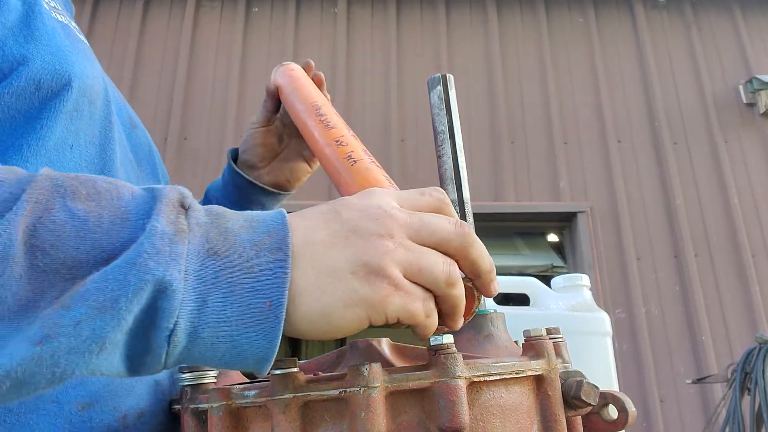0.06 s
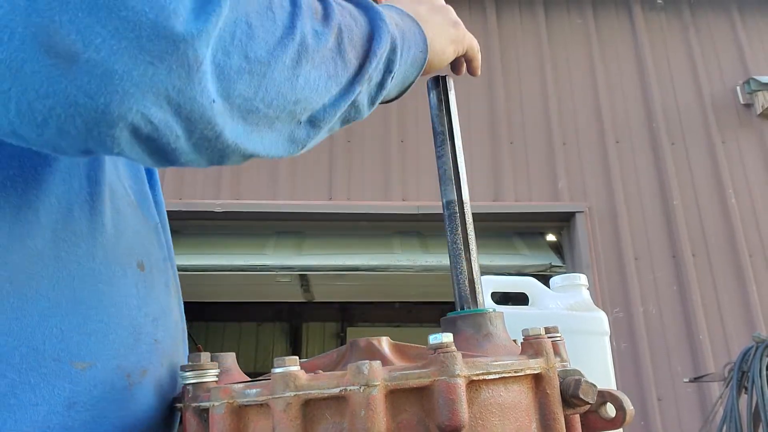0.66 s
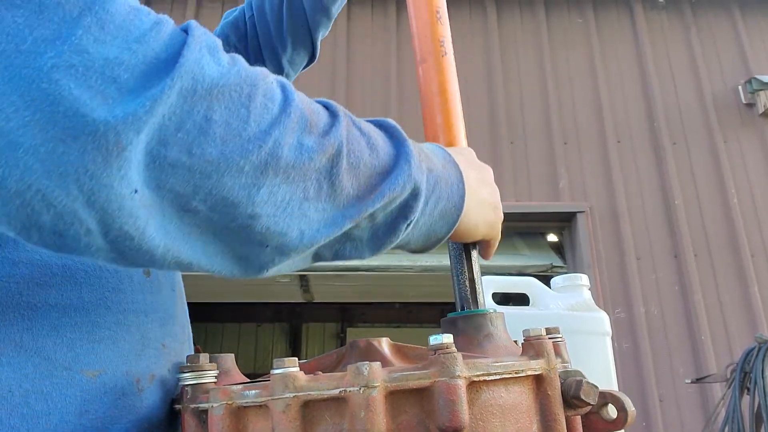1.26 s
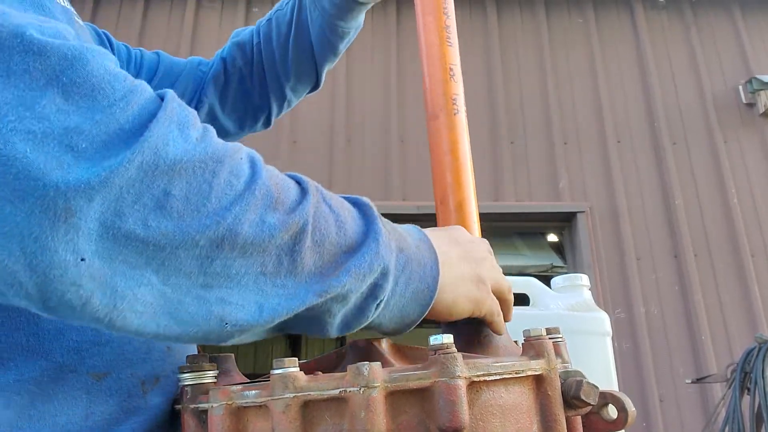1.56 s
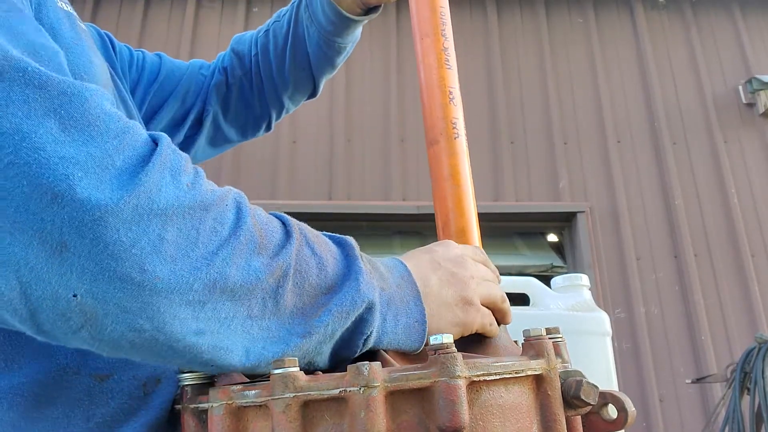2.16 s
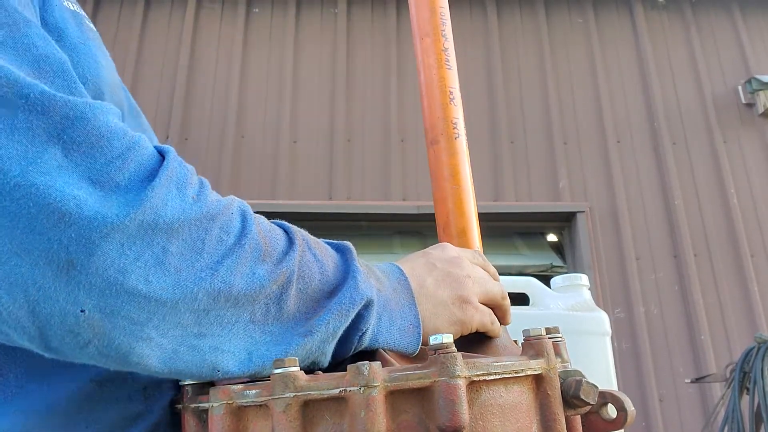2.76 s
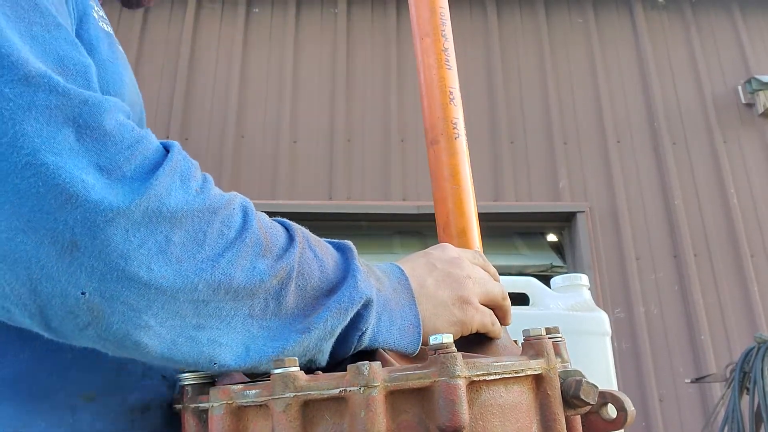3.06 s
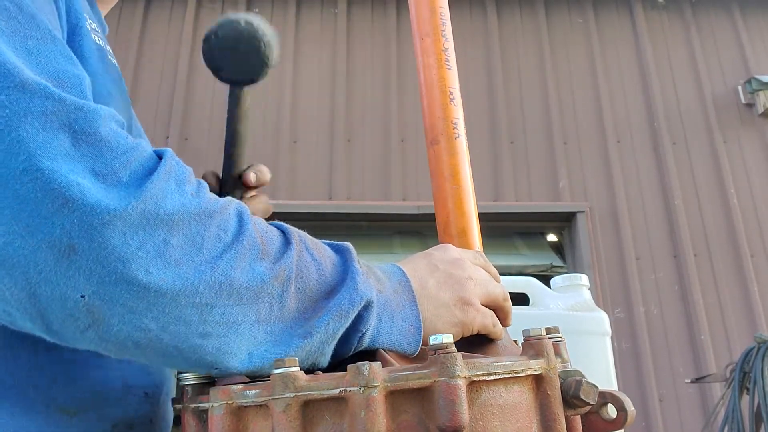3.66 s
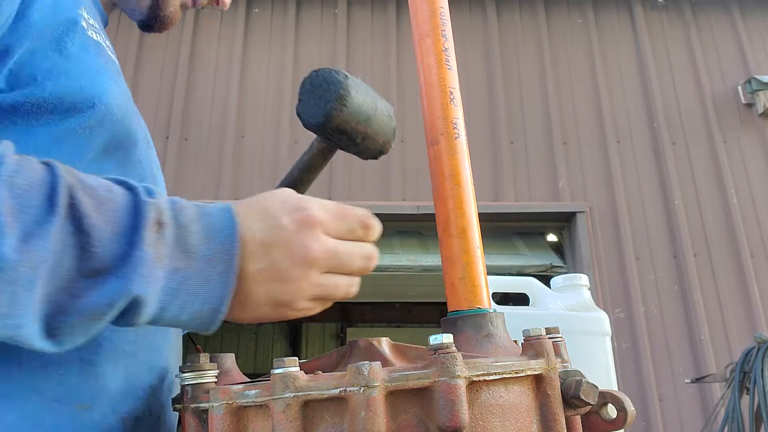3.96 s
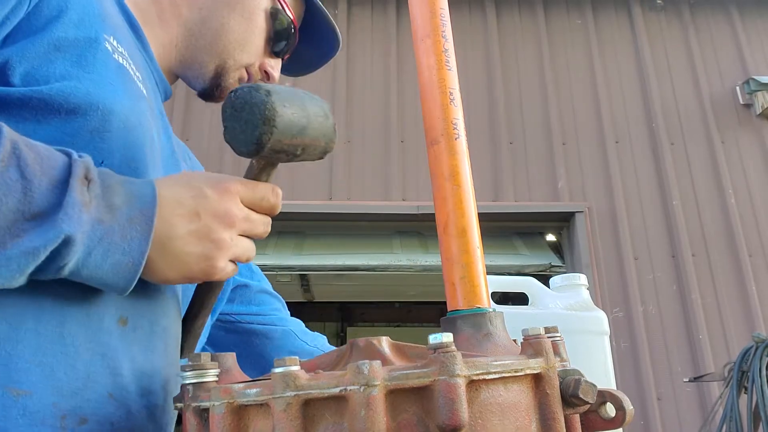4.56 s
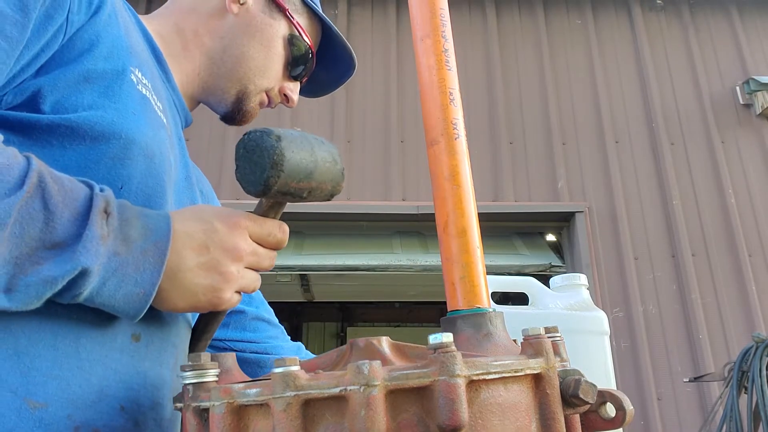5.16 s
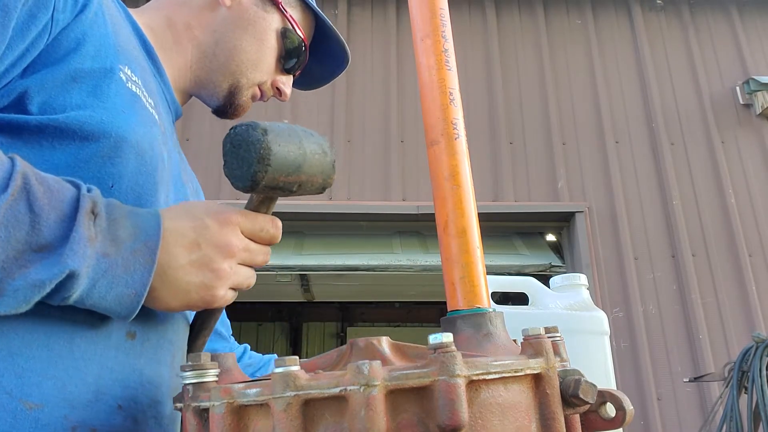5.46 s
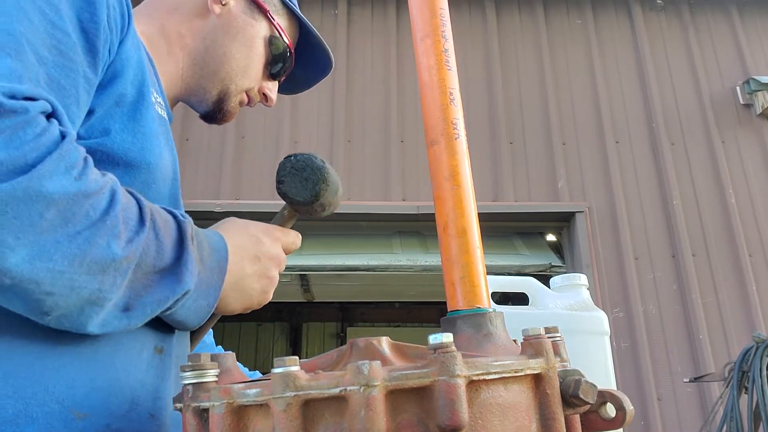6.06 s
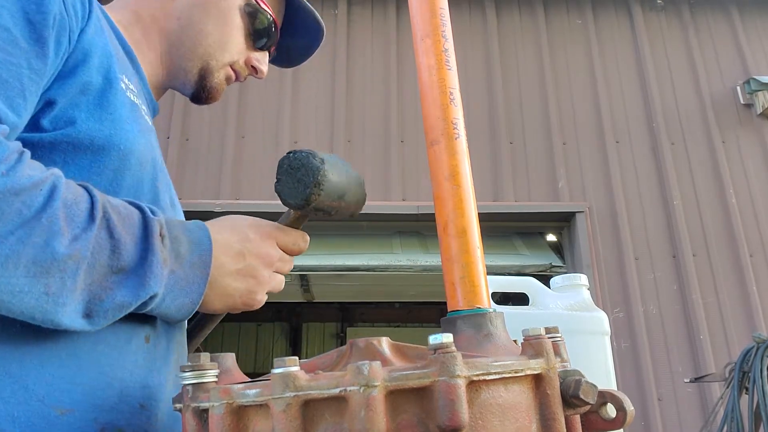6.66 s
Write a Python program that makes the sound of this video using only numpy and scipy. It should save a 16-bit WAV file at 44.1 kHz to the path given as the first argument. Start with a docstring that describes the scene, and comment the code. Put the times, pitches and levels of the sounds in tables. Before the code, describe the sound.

Hollow pipe knocks, rubbing hands and a ringing metal clank outdoors, ending in two loud thuds, with wind on the microphone.

```python
"""Outside a metal workshop a light wind buffets the microphone ports while hands and sleeves rub.
A plastic pipe knocks onto a gearbox shaft (0.8 s), its air column ringing, and slides down by stick-slip
friction; dull knocks, ticks and scrapes follow. A mallet is lifted with a clank of metal modes (3.4 s),
the grip squeaks, and small birds call far away (from 4.3 s). Last come the heaviest knocks
(6.1 and 6.5 s); with the second the bench sways in its low modes and the work shifts with a groan."""
import sys
import numpy as np
from scipy import signal
from scipy.fft import rfft, irfft, next_fast_len
from scipy.io import wavfile
from scipy.ndimage import uniform_filter1d, map_coordinates

SR = 44100
rng = np.random.default_rng(int(sys.argv[2]) if len(sys.argv) > 2 else 0)


def transcribe(u):
    """Save the signal u as a 16-bit wav file named by the first command-line argument.

    u: samples, shape (n,) or (channels, n), limited to [-1, 1]; the rate is SR.
    q: integer samples, one column per channel.
    """
    v = np.clip(np.atleast_2d(u).T, -1, 1)
    q = np.round(v * 32767).astype(np.int16)
    wavfile.write(sys.argv[1], SR, q)


N = 300321

# Levels are relative within a table; a spectrum lists density; pan is left minus right.
BREEZE = [(0, -48.5), (.45, -53), (.72, -41.5), (1, -54.5), (1.35, -53), (1.65, -54.5), (2, -44.5),
          (2.45, -64), (2.9, -59.5), (3.45, -50.5), (3.95, -50.5), (4.35, -47), (4.95, -44.5),
          (5.22, -52.5), (5.6, -48), (5.9, -64), (6.35, -65.5), (6.8, -55)]  # strength of the buffeting: t/s, level/dB
# left-right balance of the wind rumble, which at times drops out on one side: t/s, pan/dB
RUMBLE_BALANCE = [(0, 1), (1.4, 1.5), (2.25, 1), (2.45, 29.5), (2.95, 18), (3.1, 6), (3.35, -12), (4.05, 2),
                  (4.3, 14.5), (4.9, 7.5), (5.15, 1.5), (6.5, -3.5)]
GUSTS = [(.21, 0.11, -47), (.61, 0.03, -42.5), (2.23, 0.066, -42.5), (3.135, 0.06, -35),
         (4.035, 0.056, -37), (4.235, 0.034, -35), (4.32, 0.065, -36.5), (4.73, 0.028, -36.5),
         (4.975, 0.075, -36.5), (5.44, 0.091, -38.5), (5.535, 0.022, -33), (5.74, 0.028, -44.5),
         (6.03, 0.12, -41), (6.17, 0.028, -40.5)]  # the strongest puffs: t/s, duration/s, level/dB
BUFFET_SPECTRUM = [(20, -19), (50, -1.5), (80, 3), (120, -4), (180, -14), (300, -21.5), (600, -40),
                   (1500, -107)]  # turbulence at the ports: f/Hz, level/dB
AIR_SPECTRUM = [(24, -34), (40, -29), (107, 4), (225, -17.5), (428, -13.5), (990, -13), (1300, -23),
                (2290, -22), (2930, -26.5), (6460, -25), (7680, -40.5), (8910, -24.5), (10300, -31.5),
                (13600, -17), (14600, -27)]  # outdoor background: f/Hz, level/dB

HAND_STROKES = [(1.072, 0.068, -50, -63), (1.273, 0.064, -53.5, -72), (1.404, 0.068, -52, -60.5),
                (1.749, 0.064, -54, -78), (2.16, 0.04, -54.5, -65), (2.57, 0.036, -56, -54.5),
                (2.623, 0.074, -48, -59), (2.99, 0.094, -46, -61.5), (3.115, 0.049, -46.5, -57),
                (3.877, 0.04, -45, -53), (3.957, 0.028, -52, -55), (4.179, 0.055, -50, -56.5),
                (4.456, 0.02, -44.5, -76), (4.53, 0.027, -66, -58), (5.05, 0.047, -58, -55),
                (5.565, 0.038, -56.5, -65), (6.046, 0.12, -46.5, -59), (6.364, 0.036, -55, -53.5),
                (6.573, 0.034, -39, -53)]  # separate strokes: t/s, duration/s, rub level/dB, rustle level/dB
IDLE_HANDS = [(0, -59.5, -60.5), (.5, -64.5, -67), (.95, -56, -60.5), (1.65, -60.5, -64.5),
              (1.95, -55, -65), (2.4, -61, -67), (2.9, -60, -66.5), (3.3, -57, -64.5), (3.8, -51, -54.5),
              (4.3, -56, -60.5), (5, -57, -61), (5.3, -69, -64), (5.7, -59, -62), (5.95, -66.5, -69.5),
              (6.8, -61.5, -70.5)]  # motion between strokes: t/s, rub level/dB, rustle level/dB
RUB_SPECTRUM = [(130, -10), (220, -5), (306, 1.5), (377, 1.5), (444, 3), (658, -1.5), (1200, -12),
                (1330, -19.5), (2420, -17), (2600, -60), (3380, -71), (5720, -120)]  # hand on pipe: f/Hz, level/dB
SLEEVE_SPECTRUM = [(700, -18), (1400, -0.5), (2100, 1), (3000, -2), (4500, -2.5), (7500, -9), (12000, -6),
                   (14500, -7.5)]  # rustling cloth: f/Hz, level/dB

# knocks on the work: t/s, level/dB, contact centre f/Hz, crack level/dB, ring time factor, pan/dB
IMPACTS = [(0.7719, -15.5, 398, -17, 1.14, 0.5), (0.7888, -18, 410, -16, 1.04, 1.5),
           (0.8031, -24.5, 275, -20, 0.9, -2), (.847, -38, 700, -20, 0.63, 3),
           (0.8878, -27.5, 780, -21, 0.86, 1), (1.263, -31.5, 310, -22, 2, 1),
           (1.442, -35, 586, -20, 2.1, 1), (1.77, -41, 625, -28, 1.1, 5), (1.792, -40, 650, -24, 0.43, -1),
           (1.9, -38, 870, -11, .35, 2), (2.16, -39.5, 570, -24, 1.1, 1), (2.653, -37, 523, -5, 1.6, 1),
           (3.028, -39, 574, -28, 1.9, 7), (3.3785, -51, 2100, -10, 0.55, -3),
           (3.724, -34, 496, -28, 2.5, 2), (3.902, -38, 456, -22, 1.7, 8), (4.469, -30, 417, -20, 0.57, 2),
           (4.732, -44.5, 456, -26, 0.46, -12), (5.577, -44, 520, -3, 0.52, 1),
           (5.636, -44, 400, -3, 0.46, -2), (6.12, -9, 677, -47, 0.27, 3.5),
           (6.1418, -13, 575, -29, 0.4, 0), (6.1557, -25, 580, -41, 0.45, 0),
           (6.5466, 2.5, 770, -23, 0.7, 1), (6.573, -39, 4500, 1, 0.45, 0),
           (6.5939, -21.5, 810, -28, 0.94, 6), (6.6095, -14, 480, -34, 0.43, 2),
           (6.618, -22, 1350, -40, 0.37, 0), (6.6227, -18.5, 374, -36, 0.68, -2),
           (6.656, -30, 330, -31, 1.3, 0), (6.684, -36, 830, -32, 2, 0)]
BODY_MODES = [(267, -0.5, 0.13), (452, 9.5, 0.026), (490.3, 9, 0.091), (598, 4.5, 0.041), (759, 7, 0.049),
              (950, 9.5, 0.032), (1066, 9, 0.012), (1161, 5, 0.077), (1270, -10.5, 0.066),
              (1430, -7.5, 0.16), (2050, -4, 0.085), (3746, -19, .06)]  # pipe and housing: f/Hz, level/dB, t60/s
AIR_COLUMN_MODES = [(299.4, 2, 0.11), (570, 3, 0.079), (882, 4, 0.06), (1190, 4, 0.068), (1730, 6.5, 0.067)]  # air in the pipe with both ends open: f/Hz, level/dB, t60/s
CRACK_SPECTRUM = [(800, 9.5), (2200, 0.5), (3000, -2), (4100, 1.5), (5500, -16.5), (7000, -9.5),
                  (8500, -15.5), (14500, -22)]  # contact noise: f/Hz, level/dB

PIPE_PUSHES = [(1.107, 0.068, -50.5, 2170), (1.258, 0.075, -57, 7540), (1.345, .016, -61, 7000),
               (1.42, 0.059, -61, 3530)]  # pushes down the shaft: t/s, duration/s, level/dB, favoured f/Hz
SHAFT_MODES = [(1580, 4), (2400, -1), (3270, 2.5), (4130, 4.5), (6150, 2), (6750, -2)]  # resonances under the dragging rim: f/Hz, level/dB
RASP_SPECTRUM = [(1500, -26), (4000, -9), (6300, -3), (8000, -5), (12500, 2), (14500, -12)]  # dry hiss of sliding: f/Hz, level/dB
DRY_CLICKS = [(1.26, -46, 1220), (1.261, -47, 4120), (3.708, -40.5, 1940), (3.889, -47, 4020),
              (3.904, -37, 1650), (3.913, -45, 2080), (3.969, -43, 1850), (3.977, -48, 2200),
              (3.993, -42.5, 1220), (4.005, -40.5, 1750), (4.044, -47, 1080), (4.082, -46, 1400),
              (4.106, -45, 2670), (4.122, -46, 3380), (4.207, -46, 2020), (4.464, -51, 1900)]  # clicks of rim and mallet handle: t/s, level/dB, f/Hz
# short scrapes, then from 4.55 s faint twitters: t/s, duration/s, level/dB, lowest resonance f/Hz
SCRAPES_AND_TWITTERS = [(2.651, 0.024, -51.5, 2050), (3.253, 0.027, -59, 1290), (4.198, 0.041, -57, 1930),
                        (4.46, 0.018, -56.5, 2100), (4.55, 0.031, -61, 2240), (4.69, 0.027, -63.5, 2150),
                        (4.889, 0.04, -61, 2070), (4.946, 0.023, -61, 2280), (5.068, 0.022, -57, 2200)]
NARROW_BANDS = [(1, 20), (1.55, 6), (2.1, -10)]  # their resonances: ratio to the lowest, level/dB

MALLET_LIFT = [(3.378, -31.5, -34.5)]  # the clank: t/s, clatter level/dB, ring level/dB
METAL_MODES = [(592, -7, 1.2), (694, -6, 0.39), (802, -15, 1.4), (991, -10, 0.72), (1453, -20, 0.8),
               (1518, -11, 0.41), (1577, -3, 0.39), (1642, -6, 0.39), (1814, -3, 0.3), (2008, -4, 0.41),
               (2040, -11, 0.62), (2180, 0, 0.26), (2331, -14, 0.48), (2471, -9, 0.35)]  # ringing metal: f/Hz, level/dB, t60/s
CLATTER_SPECTRUM = [(120, -50), (200, -40), (319, -2.5), (499, -12), (576, -3.5), (795, -5), (1270, -15),
                    (1540, -5), (2090, -4), (2890, -17.5), (4440, -15.5), (7080, -21.5), (11900, -17),
                    (14500, -22.5)]  # rattling metal: f/Hz, level/dB
CLATTER_T60 = [(500, 0.74), (2000, 0.55), (4500, 0.41), (12000, 0.19)]  # its decay: f/Hz, t60/s
# the shifting grip: t/s, duration/s, start f/Hz, end f/Hz, level/dB, fractional pitch waver, pan/dB
GRIP_SQUEAKS = [(3.722, .016, 6100, 6500, -53, .04, 0), (3.72, .022, 4950, 4700, -61, .035, 0),
                (3.985, .02, 13600, 13600, -62, .006, 8), (4.093, .04, 13580, 13550, -44.5, .002, 10)]
BIRD_CALLS = [(4.322, .05, 5300, 4500, -60), (4.372, .035, 4400, 4100, -68), (4.43, .04, 3750, 4050, -70),
              (4.57, .03, 3650, 3850, -68), (4.59, .04, 4700, 4800, -68), (4.76, .075, 5300, 4100, -64),
              (4.88, .06, 4150, 3700, -68), (5.573, .02, 3200, 3050, -64), (5.625, .025, 3050, 2880, -63),
              (5.44, .035, 5850, 5680, -62.5), (5.625, .07, 5660, 5620, -69), (5.795, .06, 5640, 5610, -68),
              (5.975, .06, 5600, 5550, -67.5)]  # far birds: t/s, duration/s, start f/Hz, end f/Hz, level/dB
BENCH_SWAYS = [(6.549, -22, 180, 0.15), (6.595, -19.5, 272, 0.15), (6.611, -13.5, 86.2, 0.2),
               (6.679, -26, 89.6, 0.17)]  # the rocking bench: t/s, level/dB, f/Hz, t60/s
WORK_GROANS = [(6.594, 0.0321, 765, 439, -24)]  # the shifting work: t/s, duration/s, start f/Hz, end f/Hz, level/dB

COHERENCE = [(60, 0.34), (130, 0.22), (300, 0.78), (700, 0.077), (1500, 0), (12000, 0.015)]  # likeness of the two channels: f/Hz, correlation
SCATTER_SPECTRUM = [(250, -8), (1200, -0.5)]  # small nearby parts reflect little bass: f/Hz, level/dB
WALL_T60 = [(150, 0.42), (600, 0.18), (1500, 0.31), (5000, 0.32), (12000, 0.1)]  # echo of the wall: f/Hz, t60/s

SEATED_S, CRACK_T60_S = 1.5, 0.008  # when the pipe sits on the housing; decay of contact noise
HOARSE_DB = 1  # flutter in the strength of a call or squeak


def amp(db):
    """Amplitude ratio of a level in decibels."""
    return 10 ** (np.asarray(db) / 20)


def pan(db):
    """Left and right gains that share a level difference equally."""
    return amp(db * np.array([[.5], [-.5]]))


def unit(x):
    """Normalisation to rms 1."""
    return x / np.sqrt(np.mean(x ** 2) + 1e-20)


def unit_burst(x):
    """Normalisation of the loudest 4 ms to rms 1."""
    return x / np.sqrt(uniform_filter1d(x ** 2, size=176, axis=-1).max())


def along(points, hz):
    """Interpolation of (f/Hz, value) points on a logarithmic frequency axis."""
    f, v = np.transpose(points)
    return np.interp(np.log(hz + 1), np.log(f + 1), v)


def curves(rows):
    """Linear interpolation in time: one value per sample for each column after t/s."""
    s, *cols = np.transpose(rows)
    return [np.interp(np.arange(N) / SR, s, c) for c in cols]


def wobble(rate, n=N):
    """Smooth random modulation with rate knots a second."""
    knots = rng.standard_normal(int(N * rate / SR) + 4)
    return map_coordinates(knots, [np.arange(n) * rate / SR])


def filtered(x, response):
    """Linear filtering: the spectrum of x times a frequency response."""
    n = x.shape[-1]
    m = next_fast_len(n + SR // 4)
    return irfft(rfft(x, m) * response(np.fft.rfftfreq(m, 1 / SR)), m)[..., :n]


def noise(spectrum, n=N):
    """Partial coherence: stereo noise of rms 1, partly alike in the bass and unrelated in the treble."""
    def response(hz):
        angle = np.arccos(np.clip(along(COHERENCE, hz), -1, 1)) / 2
        return amp(along(spectrum, hz)) * [np.cos(angle), np.sin(angle)]
    mid, side = filtered(rng.standard_normal((2, n)), response)
    return unit(np.array([mid + side, mid - side]))


def damped(x, decay):
    """Frequency-dependent damping: each band of x dies with its own t60."""
    hz, t, bands = signal.stft(x, SR, nperseg=256)
    loss = amp(-60 * t / along(decay, hz)[:, None])
    return signal.istft(bands * loss, SR, nperseg=256)[1][:, :x.shape[-1]]


def fade(t, t60):
    """Exponential free decay, 60 dB in t60."""
    return np.exp(-np.log(1000) * t / t60)


def arch(t, length):
    """Half-sine envelope, zero after length."""
    return np.abs(np.sin(np.pi * np.minimum(t / length, 1)))


def add(track, s, sound):
    """Superposition of a sound on the track at time s."""
    part = track[:, round(s * SR):][:, :sound.shape[-1]]
    part += sound[..., :part.shape[1]]


def echoed(x, near_db, wall_db):
    """Reflection: quick scatter from nearby metal and a longer wall echo join the direct sound."""
    t = np.arange(SR // 2) / SR
    flat = [(100, 0), (10000, 0)]
    near = noise(SCATTER_SPECTRUM, len(t)) * fade(t, 0.037) * (t > .003)
    wall = damped(noise(flat, len(t)), WALL_T60) * (t > .012)
    echo = amp(near_db) * near / np.linalg.norm(near[0]) + amp(wall_db) * wall / np.linalg.norm(wall[0])
    return x + signal.fftconvolve(np.atleast_2d(x), echo, axes=1)[:, :x.shape[-1]]


def swells(events, attack_s, t60):
    """Incoherent addition: summed power of (t/s, duration/s, level/dB) events that rise, hold and die."""
    power, t = np.zeros((1, N)), np.arange(SR // 2) / SR
    rise = np.sin(np.pi / 2 * np.minimum(t / attack_s, 1)) ** 2
    for s, length, db in events:
        add(power, s, (amp(db) * rise * fade(np.maximum(t - length, 0), t60)) ** 2)
    return power[0]


def glide(length, start_hz, end_hz, waver, flutter_db=0):
    """A tone modulated in frequency and amplitude, with silence after it for its echo."""
    t = np.arange(SR // 2) / SR
    remaining = 1 - np.minimum(t / length, 1)
    hz = end_hz + (start_hz - end_hz) * remaining ** 1.83  # starts fast and levels off
    hz *= 1 + waver * wobble(700, len(t))
    flutter = unit(amp(flutter_db * wobble(250, len(t))))
    return flutter * np.sqrt(arch(t, length)) * np.sin(2 * np.pi * np.cumsum(hz) / SR)


def wind(eddy_db=3.5, lump_db=2):
    """Turbulent pressure: both microphone ports share eddies and puffs, and each has its own lumps."""
    breeze_db, = curves(BREEZE)
    balance_db, = curves(RUMBLE_BALANCE)
    breeze = amp(breeze_db + eddy_db * wobble(14))
    flow = np.sqrt(breeze ** 2 + swells(GUSTS, attack_s=0.0089, t60=0.19))
    lumps = amp(lump_db * np.array([wobble(28), wobble(28)]))
    return flow * pan(balance_db) * unit(lumps * noise(BUFFET_SPECTRUM))


def outdoor_air():
    """Stationary noise: the steady background of the open air."""
    return amp(-60) * noise(AIR_SPECTRUM)


def handling(catches_per_s=9.7):
    """Friction noise: the hand rubs the pipe in uneven slips, the sleeve rustles, the grip catches."""
    s, length, rub_db, rustle_db = np.transpose(HAND_STROKES)
    idle_rub, idle_rustle = amp(curves(IDLE_HANDS))
    rub = np.sqrt(idle_rub ** 2 + swells(zip(s, length, rub_db), attack_s=0.017, t60=0.34))
    rustle = np.sqrt(idle_rustle ** 2 + swells(zip(s, length, rustle_db), attack_s=0.017, t60=0.34))
    slips = amp(3.25 * wobble(90))
    fibres = amp(2 * wobble(400) + 1.3 * wobble(45))
    catches = (rng.random(N) < catches_per_s / SR) * rng.random(N)
    release = fade(np.arange(SR // 4) / SR, 0.014)
    grip = 1 + amp(-12) * signal.fftconvolve(catches, release)[:N]
    hand = rub * unit(grip * slips * noise(RUB_SPECTRUM))
    sleeve = rustle * unit(grip * fibres * noise(SLEEVE_SPECTRUM))
    return hand + sleeve * pan(1.4)


def knocks(crack_lag_s=0.000457):
    """Impact excitation: a contact shoves the body, cracks, and rings modes in a band set by hardness."""
    out, t = np.zeros((2, N)), np.arange(SR // 2) / SR
    squeeze = 1 - np.exp(-(t / 0.00071) ** 2)  # plastic gives, so the force takes a moment to build
    port_delay_s = np.array([.00006, -.00006])[:, None, None]  # the ring reaches the right port first
    for s, db, centre_hz, crack_db, ring_factor, pan_db in IMPACTS:
        # the pipe sounds hollow until it sits on the housing
        modes = [*BODY_MODES, *AIR_COLUMN_MODES] if s < SEATED_S else BODY_MODES
        hz, level, t60 = np.transpose(modes)[:, :, None]
        strength = amp(level + .8 * rng.standard_normal((2, *hz.shape)))
        decay = fade(t, t60 * ring_factor)  # a holding hand shortens the ring
        ring = np.sum(strength * np.sin(2 * np.pi * hz * (t - port_delay_s)) * decay, axis=1)
        contact = signal.butter(2, [centre_hz * .5, centre_hz * 1.64], "band", fs=SR, output="sos")
        ring = unit_burst(signal.sosfilt(contact, squeeze * ring))
        cycles = centre_hz * t
        shove = unit_burst(np.sin(2 * np.pi * cycles) * np.exp(-((cycles - 1) / 0.92) ** 2))
        crack = unit_burst(squeeze * noise(CRACK_SPECTRUM, len(t))[0] * fade(t, CRACK_T60_S))
        crack = np.array([crack, np.interp(t - crack_lag_s, t, crack)])  # later at the right port
        blow = amp(db - 12.5) * (ring + amp(1.5) * shove + amp(crack_db + 10) * crack)
        add(out, s, echoed(blow, near_db=-3.5, wall_db=-14.5) * pan(pan_db))
    return out


def sliding(slips_per_s=560, q=19, log_spread=.6):
    """Stick-slip friction: the rim drags on the steel shaft; faster pushes ring higher resonances."""
    out, t = np.zeros((2, N)), np.arange(SR // 2) / SR
    for s, length, db, bright_hz in PIPE_PUSHES:
        push = np.sqrt(arch(t, length))
        slips = push * (rng.random(len(t)) < slips_per_s / SR) * rng.standard_normal(len(t))
        ring = np.zeros(len(t))
        for hz, level in SHAFT_MODES:
            strength = amp(level) / (1 + (np.log(hz / bright_hz) / log_spread) ** 2) / np.sqrt(hz)
            ring += strength * signal.lfilter(*signal.iirpeak(hz, q, SR), slips)
        hiss = push * noise(RASP_SPECTRUM, len(t)) * bright_hz / SHAFT_MODES[-1][0]
        add(out, s, echoed(amp(db) * (unit_burst(ring) + hiss), near_db=-9, wall_db=-7.5))
    return out


def ticks(ring_cycles=21):
    """Impulse response: a snap and a damped ring as the rim catches or fingers close on the handle."""
    out, t = np.zeros((2, N)), np.arange(SR // 2) / SR
    for s, db, hz in DRY_CLICKS:
        ring = unit_burst(np.sin(2 * np.pi * hz * t) * fade(t, ring_cycles / hz))
        band = signal.butter(1, [hz * .5, hz * 2], "band", fs=SR, output="sos")
        snap = unit_burst(signal.sosfilt(band, rng.standard_normal(len(t)) * fade(t, CRACK_T60_S)))
        add(out, s, echoed(amp(db - 6) * (ring + amp(-8.5) * snap), near_db=-4, wall_db=-11))
    return out


def scrapes_and_twitters(q=14):
    """Noise-driven resonance: short scrapes, then faint twitters near 2.2 kHz, perhaps a far bird."""
    out, t = np.zeros((2, N)), np.arange(SR // 2) / SR
    for s, length, db, low_hz in SCRAPES_AND_TWITTERS:
        drive = rng.standard_normal(len(t)) ** 3 * arch(t, length)
        ring = sum(amp(level) * signal.lfilter(*signal.iirpeak(low_hz * ratio, q, SR), drive)
                   for ratio, level in NARROW_BANDS)
        add(out, s, echoed(amp(db) * unit_burst(ring), near_db=-0.5, wall_db=-7.5))
    return out


def clank(split_hz=1200, bloom_s=.014, attack_s=.002):
    """Free vibration: metal rattles and rings as the mallet leaves it; the lows swell late, via walls."""
    out, t = np.zeros((2, N)), np.arange(SR) / SR
    for s, clatter_db, ring_db in MALLET_LIFT:
        ring = np.zeros((2, len(t)))
        for hz, db, t60 in METAL_MODES:
            blur = rng.random((2, 1)) + .1 * wobble(50, len(t))  # crossing echoes blur the phase
            ring += amp(db) * np.sin(2 * np.pi * (hz * t + blur)) * fade(t, t60)
        clatter = damped(noise(CLATTER_SPECTRUM, len(t)), CLATTER_T60) * amp(2.2 * wobble(150, len(t)))
        sound = amp(clatter_db) * clatter + amp(ring_db) * ring
        low = filtered(sound, lambda hz: 1 / (1 + (hz / split_hz) ** 6))
        high = sound - low
        add(out, s, low * (1 - np.exp(-t / bloom_s)) + high * (1 - np.exp(-t / attack_s)))
    return out * pan(2.2)


def squeaks():
    """Friction tones: the grip squeaks thinly as the mallet is lifted and changes hands."""
    out = np.zeros((2, N))
    for s, length, start_hz, end_hz, db, waver, pan_db in GRIP_SQUEAKS:
        tone = amp(db) * glide(length, start_hz, end_hz, waver, HOARSE_DB)
        add(out, s, echoed(tone, near_db=1, wall_db=-9) * pan(pan_db))
    return out


def birds():
    """Reverberation blurs distant calls: mostly falling glides, then a row of thin level notes."""
    out = np.zeros((2, N))
    for s, length, start_hz, end_hz, db in BIRD_CALLS:
        steep = min(abs(np.log(start_hz / end_hz)) / .2, 1)  # steep calls are hoarse, level notes pure
        call = glide(length, start_hz, end_hz, .002 + .032 * steep, HOARSE_DB * steep)
        add(out, s, echoed(amp(db) * call, near_db=-7, wall_db=-4))
    return out


def bench(build_cycles=1.4):
    """Damped oscillation: under a heavy knock the bench sways in its low modes and settles."""
    out, t = np.zeros((2, N)), np.arange(SR // 2) / SR
    port_phase = np.array([[-.35], [.35]])  # the sway reaches the right port first
    for s, db, hz, t60 in BENCH_SWAYS:
        build = 1 - np.exp(-(t * hz / build_cycles) ** 2)
        add(out, s, amp(db) * np.sin(2 * np.pi * hz * t + port_phase) * fade(t, t60) * build)
    return out


def groan():
    """Frequency modulation: a rough tone sinks as the shifting parts come to rest."""
    out = np.zeros((2, N))
    for s, length, start_hz, end_hz, db in WORK_GROANS:
        tone = amp(db) * glide(length, start_hz, end_hz, waver=.05)
        add(out, s, echoed(tone, near_db=2, wall_db=-11.5))
    return out


def scene():
    """Superposition of all sources on the steady outdoor air."""
    events = knocks() + ticks() + groan() + bench() + clank() + scrapes_and_twitters()
    return events + handling() + sliding() + squeaks() + wind() + birds() + outdoor_air()


def record(dry, top_hz=14750):
    """Saturation and band limiting: the recorder clips at full scale and keeps nothing above top_hz."""
    return filtered(np.clip(dry, -1, 1), lambda hz: hz < top_hz)


dry = scene()
out = record(dry)
transcribe(out)
```